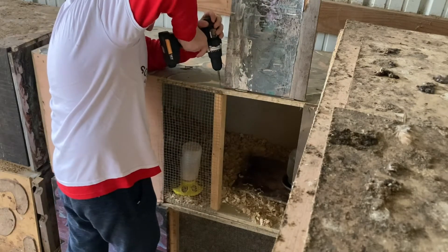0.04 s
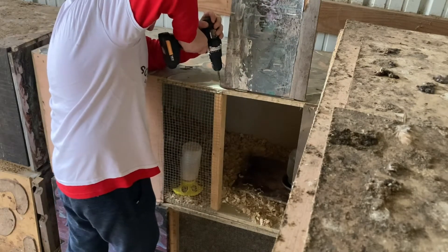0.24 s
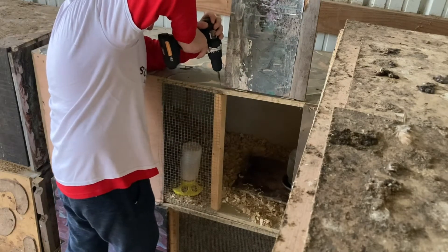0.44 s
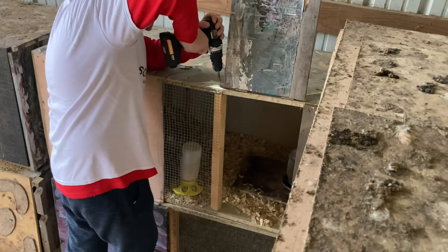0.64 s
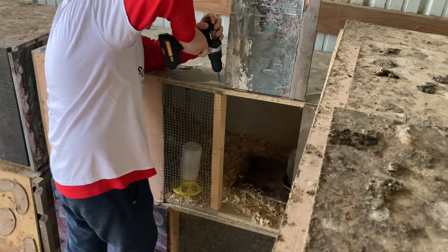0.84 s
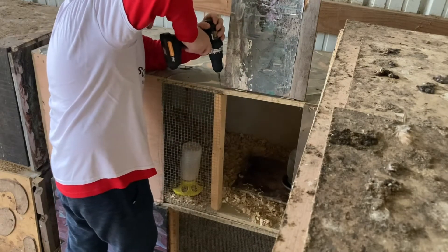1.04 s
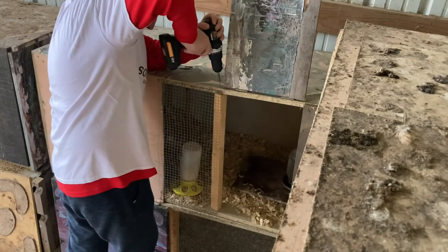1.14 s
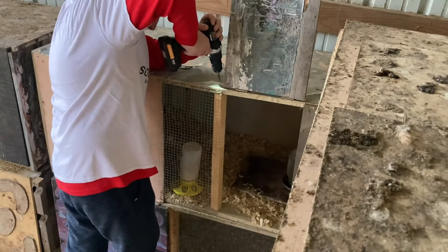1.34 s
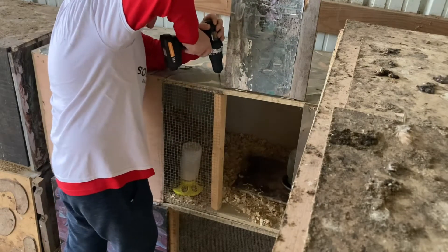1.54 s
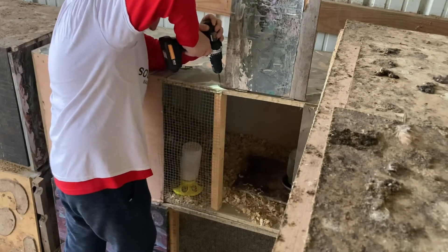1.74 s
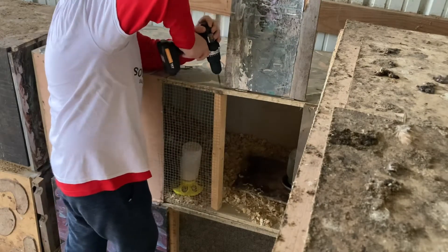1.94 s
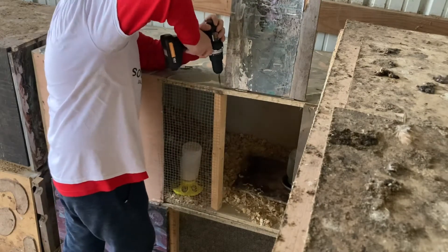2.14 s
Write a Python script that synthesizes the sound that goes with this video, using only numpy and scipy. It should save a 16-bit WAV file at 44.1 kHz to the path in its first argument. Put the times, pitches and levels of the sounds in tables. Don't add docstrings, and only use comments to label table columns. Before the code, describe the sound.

A cordless driver on a wooden hutch, already running at the start, lands hollow booming blows near 0.33, 0.71, 1.43 and 1.84 seconds. Before each, a trigger clicks, gears clunk and a gritty whine spins up briefly, then brakes. The pause around 0.8-1.3 holds board rumble, a trigger click and tiny taps. Low barn rumble, short echo; faint cloth rustle after 1.9, soft cluck near 2.2.

```python
import sys
import numpy as np
from scipy import signal
from scipy.fft import rfft, irfft
from scipy.io import wavfile
from scipy.ndimage import uniform_filter1d

SR = 44100
rng = np.random.default_rng(int(sys.argv[2]) if len(sys.argv) > 2 else 0)


def pcm_store(signal):
    levels = np.round(np.clip(np.atleast_2d(signal), -1, 1) * 32767)
    wavfile.write(sys.argv[1], SR, levels.astype(np.int16).T)


def ratio(d):
    e = np.asarray(d, float) / 20
    return 10 ** e


N = 97020
LEAD_IN = 22050
M = N + LEAD_IN
T = (np.arange(M) - LEAD_IN) / SR
F = np.fft.rfftfreq(M, 1 / SR) + 1e-3
LEFT_RIGHT = np.array([[1], [-1]])
LN_60DB = np.log(1000)
METAL_LEAD_S = .0057


def level(x, db):
    return x * ratio(db) / np.sqrt(np.mean(x ** 2))


def read(table, col=1):
    table = np.array(table, float)
    return np.interp(np.log(F), np.log(table[:, 0]), table[:, col])


def shaped(x, gain):
    return irfft(rfft(x) * gain, M)


def band(hz, width_hz):
    return 1 / (1 + 1j * (F - hz ** 2 / F) / width_hz)


def walk(rate_hz):
    k = int(SR / rate_hz)
    steps = np.repeat(rng.standard_normal(M // k + 1), k)
    return level(uniform_filter1d(uniform_filter1d(steps, k), k)[:M], 0)


def ring(at_s, hz, t60_s, late_cycles=0., build_cycles=0.35):
    out = np.zeros(M)
    start_s = at_s + late_cycles / hz
    i = int(start_s * SR) + LEAD_IN
    u = (T[i:i + int(1.5 * t60_s * SR)] - start_s).clip(0)
    build = 1 - np.exp(-u * hz / build_cycles)
    out[i:i + len(u)] = np.exp(-LN_60DB * u / t60_s) * np.sin(2 * np.pi * hz * u) * build
    return out


def knock(at_s, db, modes, noise_db=-4, noise_s=0.009):
    detune = 1 + .02 * rng.standard_normal(len(modes))
    spit = rng.standard_normal(M) * np.exp(-(T - at_s).clip(0) / noise_s) * (T > at_s)
    spit = shaped(spit, sum(ratio(g) * band(f, f / 3) for f, g, _ in modes))
    tones = sum(ratio(g) * ring(at_s, f * e, t60) for (f, g, t60), e in zip(modes, detune))
    return ratio(db) * (tones + ratio(noise_db) * spit)


# trigger [t/s], gears engage [t/s], blow [t/s]
BURSTS = [
    (-.265, -.24, -.109),
    (.1725, .1965, .3273),
    (.5581, .5811, .7099),
    (1.2989, 1.3204, 1.4285),
    (1.7195, 1.7429, 1.8434),
]
# motor, blow, trigger, engage, crack [level/dB]
FORCES = [(-13.5, -7, 10.5, -4, -13.5), (-1, -2, -6.5, 3, -2), (-0.5, -0.95, -4, 1, 0.5),
          (0.5, -0.4, 1, 3.5, 0), (0, -2.36, -4, -0.5, 2.5)]
# full-speed mesh [f/Hz], kick as the blow frees the motor [f/Hz], spin-up [t/s], blow to brake [t/s]
SPEEDS = [(2800, 100, .03, .03), (2830, 100, .034, .03), (2860, 40, .027, .02), (2800, 60, .03, .035),
          (2830, 170, .026, .01)]
# coasting after the blow [t/s], whine after the blow [level/dB]
COASTS = [(0.014, -5), (0.021, -3.5), (0.029, -17.5), (0.041, -3.5), (0.048, 6)]
# [f/Hz], [level/dB]
GEARS = [(150, 2), (500, 0.5), (1700, 1.5), (2700, 6), (5500, 0), (8500, 1), (11500, 0.5), (16000, -2)]
# [f/Hz], width [f/Hz], [level/dB]
HOUSING = [(432, 90, -44.5), (1670, 300, -52), (2762, 1170, -46.5), (3170, 150, -48), (4853, 1600, -43),
           (10830, 770, -47)]
# multiple of mesh [-], [level/dB]
WHINE = [(1, -37), (2, -54), (3, -45), (4, -42)]


def motor():
    brake_hz_per_s, mesh_per_turn, turn_beat = 20000, 6.5, 0.39
    creep_s, creep_db, creep_db_per_s = .022, -9, 1500
    rise_s, fade_s, swell_db = .012, 0.01, -1
    bump_db, bump_lead_s, bump_s = 1, 0.019, 0.0064
    hz, env, freed_db = np.zeros((3, M))
    for burst, speeds, force, (coast_s, after_db) in zip(BURSTS, SPEEDS, FORCES, COASTS):
        _, on, blow = burst
        top_hz, kick_hz, spin_s, brake_s = speeds
        run = (T > on - creep_s) & (T < blow + .15)
        speed = top_hz * (1 - np.exp(-(T - on + .006).clip(0) / spin_s))
        speed = speed + kick_hz * (T > blow - METAL_LEAD_S)
        hz += run * (speed - brake_hz_per_s * (T - blow - brake_s).clip(0)).clip(200)
        creep = ratio(creep_db + creep_db_per_s * (T - on).clip(-1, 0))
        rise = creep + (1 - np.exp(-(T - on + 0.0039).clip(0) / rise_s))
        swell = swell_db * (T - blow).clip(-1, 0) / (blow - on)
        bump = bump_db * np.exp(-((T - blow + bump_lead_s) / bump_s) ** 2)
        fade = np.exp(-(T - blow - coast_s).clip(0) / fade_s)
        env += run * rise * ratio(force[0] + swell + bump) * fade
        freed_db += run * after_db * (T > blow - bump_lead_s)
    phase = 2 * np.pi * np.cumsum(hz * (1 + .012 * walk(150))) / SR
    grit = rng.standard_normal(M) * (1 + turn_beat * np.sin(phase / mesh_per_turn))
    rattle = level(shaped(grit, ratio(read(GEARS))), -27.5)
    housing = sum(level(shaped(grit, band(f, w) ** 2), g) * ratio(1.0 * walk(60)) for f, w, g in HOUSING)
    whine = sum(ratio(g + freed_db + 5 * walk(70)) * np.sin(round(k) * phase) for k, g in WHINE)
    return env * (rattle + housing + whine * (hz / 2800) ** 3)


# [f/Hz], [level/dB], [t60/s]
CLICK = [(7400, -42, .006), (10500, -41, .006), (12500, -44, .005), (5200, -50, .008), (2500, -54, .01)]
# [f/Hz], [level/dB], [t60/s]
ENGAGE = [(1650, -24, .03), (2900, -29, .03), (4800, -36, .02), (500, -33, .05)]
# [f/Hz], [level/dB], [t60/s]
CRACK = [(950, -27, .05), (1250, -26, .04), (1560, -17, .04), (2650, -28, .03), (620, -24, .07),
         (780, -28, .06)]
# [t/s], [level/dB]
TOUCHES = [
    (1.1508, -6),
    (1.257, -22),
]
# [t/s], [level/dB]
TAPS = [
    (1.18, -45),
    (1.215, -47),
]


def clicks():
    click_s = .004
    out = sum(knock(t, db, CLICK, 0.69, click_s) for t, db in TOUCHES)
    out = out + sum(knock(t, db, CRACK) for t, db in TAPS)
    for (pull, on, blow), (_, _, pull_db, on_db, hit_db) in zip(BURSTS, FORCES):
        out = out + knock(pull, pull_db, CLICK, 1.1, click_s)
        out = out + knock(on, on_db, ENGAGE)
        out = out + knock(blow - METAL_LEAD_S, hit_db, CRACK)
    return out


# [f/Hz], [level/dB], [t60/s], polarity [-]
BOARDS = [(55.5, -21.4, 0.443, -1), (69.5, -14.0, 0.364, -1), (86.3, -22.2, 0.829, 1),
          (99.4, -16.1, 0.465, -1), (111.8, -11.7, 0.39, -1), (126.1, -29.8, 1.2, 1),
          (140.1, -13.3, 0.282, -1), (170.0, -19.0, 0.229, 1), (178.8, -21.3, 0.355, -1),
          (211.2, -39.7, 0.81, 1), (230.5, -19.1, 0.252, 1)]
# [f/Hz], [level/dB], [t60/s], polarity [-]
HUTCH = [(264.7, -27.6, 0.387, 1), (313.7, -14.3, 0.213, -1), (339.8, -25.8, 0.377, -1),
         (350.0, -21.8, 0.409, 1), (368.5, -21.5, 0.257, 1), (394.4, -22.4, 0.147, -1),
         (423.6, -14.4, 0.183, -1), (453.5, -14.0, 0.11, 1), (485.1, -26.3, 0.187, -1),
         (546.9, -24.6, 0.126, 1), (599.6, -33.3, 0.229, 1)]


def wood_modes(modes, db, pan_db, longest_s):
    late_cycles, build_cycles = .465, 1.02
    out = 0
    side_db = pan_db + 1.4 * rng.standard_normal(len(modes))
    vary_db = 0.4 * rng.standard_normal((len(BURSTS), len(modes)))
    for k, (f, g, t60, sign) in enumerate(modes):
        mode = sum(ratio(force[1] + v) * ring(burst[2] - METAL_LEAD_S, f, min(t60, longest_s),
                                            late_cycles, build_cycles)
                   for burst, force, v in zip(BURSTS, FORCES, vary_db[:, k]))
        out = out + sign * ratio(db + g + LEFT_RIGHT / 2 * side_db[k]) * mode
    return out


def boom():
    boards = wood_modes(BOARDS, db=3, pan_db=-2.4, longest_s=.75)
    return boards + wood_modes(HUTCH, db=3, pan_db=.6, longest_s=.28)


# [f/Hz], width [f/Hz], [level/dB], [t60/s]
SHAKE = [(112.4, 83, -36.5, 1), (260, 125, -34.5, 0.65), (517, 210, -38.5, 0.44), (694, 370, -44, 0.36)]


def shake():
    out = 0
    for hz, width_hz, db, t60 in SHAKE:
        env = 0
        for _, _, blow in BURSTS:
            env = env + np.exp(-LN_60DB * (T - blow).clip(0) / t60) * ((T - blow) * 50).clip(0, 1)
        mid, side = shaped(rng.standard_normal((2, M)), band(hz, width_hz) ** 2)
        out = out + env * level(mid + min(hz / 700, 1) * side * LEFT_RIGHT, db)
    return out


# [f/Hz], [t60/s], [level/dB], stereo width 0-1 [-]
ROOM = [(95.3, 0.82, -23.5, 0.08), (256, 0.33, -18, 0.2), (870, 0.31, -11, 0.95), (3130, 0.22, -15, 1),
        (6900, 0.11, -14, 0.5), (14000, 0.2, -22, 0.9)]


def echo(x):
    delay_s = 0.0054
    u, tail = np.arange(M) / SR - delay_s, 0
    for hz, t60, db, width in ROOM:
        decay = np.exp(-LN_60DB * u / t60) * (u > 0) * (u < 1)
        mid, side = shaped(rng.standard_normal((2, M)), band(hz, hz)) * decay
        part = mid + np.clip(width, 0, 1) * side * LEFT_RIGHT
        tail = tail + ratio(db) * part / np.sqrt(t60 * SR / (2 * LN_60DB)) / np.sqrt(np.pi * hz / SR)
    return shaped(x, rfft(tail))


# [t/s], length [t/s], [f/Hz], [level/dB], overtone [level/dB]
BIRDS = [
    (.085, .035, 6850, -72, -40),
    (2.182, .03, 700, -47, -11),
    (.97, .14, 620, -63, -30),
]


def birds():
    out = 0
    for at, length_s, hz, db, over_db in BIRDS:
        phase = 2 * np.pi * hz * np.cumsum(1 + .01 * walk(40)) / SR
        env = np.sin(np.pi * ((T - at) / length_s).clip(0, 1))
        out = out + ratio(db) * env * (np.sin(phase) + ratio(over_db) * np.sin(2 * phase))
    return out


# [f/Hz], [level/dB]
BARN = [(30, -6), (120, -2), (200, -20), (600, -27), (1500, -44), (3500, -58), (7000, -64), (16000, -68)]


def barn():
    rumble = 0
    for hz in 40 * 2. ** np.arange(9):
        mid, side = shaped(rng.standard_normal((2, M)), ratio(read(BARN)) * band(hz, hz * 2.1))
        rumble = rumble + ratio(2 * walk(7.2)) * (mid + min(hz / 800, 1) * side * LEFT_RIGHT)
    rustle_at_s = 1.92
    rustle = shaped(rng.standard_normal((2, M)), band(8000, 14000)) * ratio(2 * walk(25.63))
    return level(rumble, -44.5) + level(rustle, -60) * ((T - rustle_at_s) * 10).clip(0, 1)


# [f/Hz], left lead [rad]
PORTS = [(0, 0), (1600, -.6), (3200, 1.2), (5400, 2.8), (6900, 0), (9100, -3.14), (13750, -9.42),
         (17000, -14)]
# [f/Hz], L-R [level/dB]
BALANCE = [(300, -.5), (1500, 2), (5000, 0), (16000, -0.5)]


def scene():
    near, wood = motor() + clicks() + birds(), boom()
    wood_echo_db = -12
    direct = near + echo(near + ratio(wood_echo_db) * wood.mean(axis=0))
    lead_rad = np.interp(F, *np.array(PORTS).T)
    half = LEFT_RIGHT / 2
    heard = shaped(direct, ratio(half * read(BALANCE)) * np.exp(1j * half * lead_rad))
    return (heard + wood + shake() + barn())[:, LEAD_IN:]


def top_cut(x):
    return signal.sosfilt(signal.butter(12, 17110, fs=SR, output="sos"), x)


# low [f/Hz], high [f/Hz]
MID_GAPS = [(8600, 9600), (13100, 14400)]
# low [f/Hz], high [f/Hz]
SIDE_GAPS = [(6900, 7500), (11300, 12050)]


def record(dry):
    top_hz, edge_hz = 15950, 160
    hz = np.fft.rfftfreq(N, 1 / SR)

    def edge(off_hz):
        return np.sin(np.pi / 2 * (off_hz / edge_hz + 1).clip(0, 1)) ** 2

    def keep(gaps):
        outside = [edge(np.maximum(lo - hz, hz - hi)) for lo, hi in gaps]
        return np.prod(outside, axis=0) * edge(top_hz - hz)

    mid = irfft(rfft(dry[0] + dry[1]) / 2 * keep(MID_GAPS), N)
    side = irfft(rfft(dry[0] - dry[1]) / 2 * keep(SIDE_GAPS), N)
    bass_cut = signal.butter(2, 30, "high", fs=SR, output="sos")
    mix = signal.sosfilt(bass_cut, np.array([mid + side, mid - side]))
    return top_cut(mix)


dry = scene()
out = record(dry)
pcm_store(out)
```